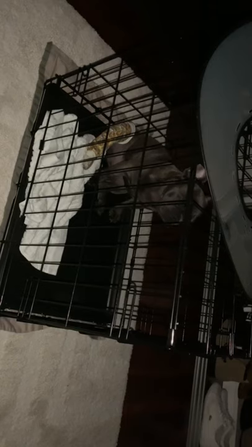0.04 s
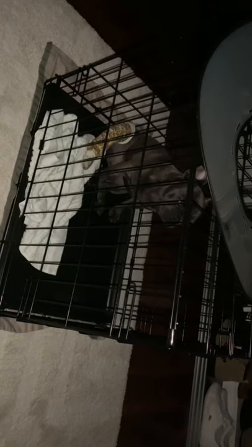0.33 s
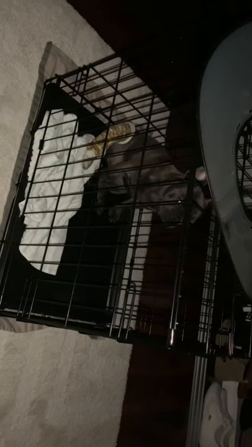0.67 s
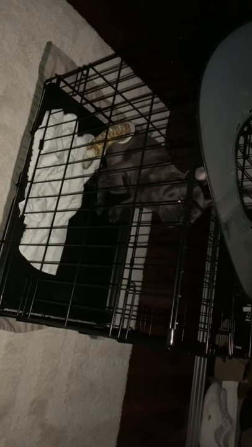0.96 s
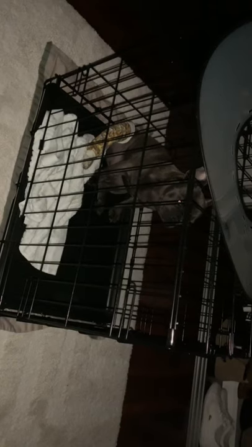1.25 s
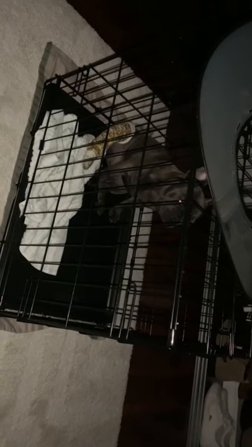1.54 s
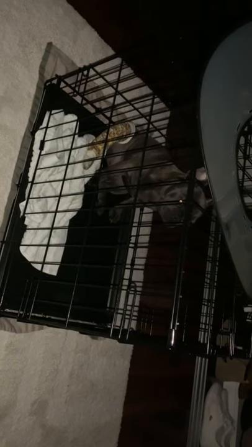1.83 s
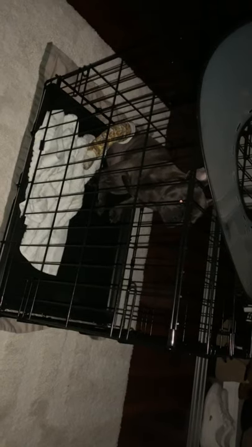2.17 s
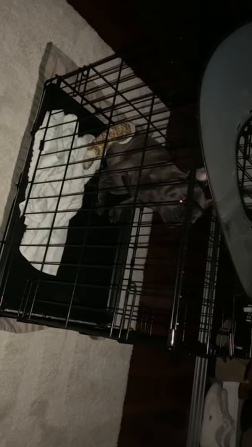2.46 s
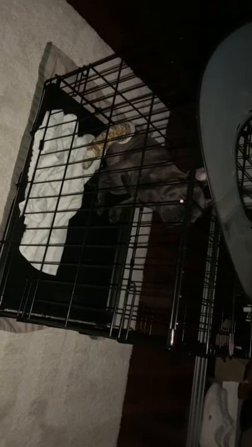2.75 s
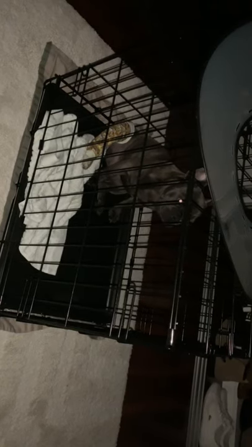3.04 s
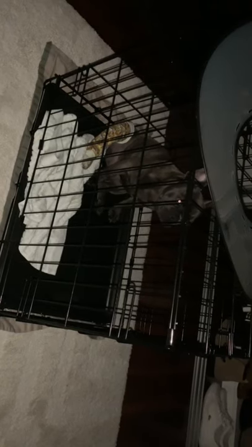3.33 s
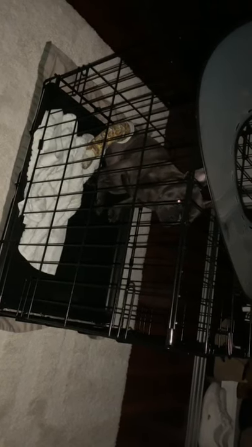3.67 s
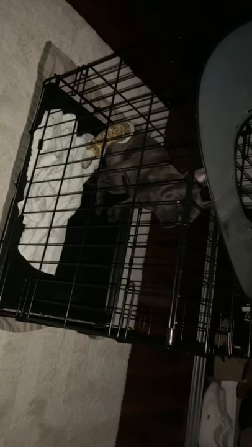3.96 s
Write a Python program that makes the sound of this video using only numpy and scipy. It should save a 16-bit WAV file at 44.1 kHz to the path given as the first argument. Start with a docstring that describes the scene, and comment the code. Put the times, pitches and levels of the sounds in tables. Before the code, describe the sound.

A dog gives a rough, pulsing snore that ends in a small grunt and a breath out. Faint wire ticks, bedding rustles and a lip smack follow, then a loud nose squeak, in a small room with humming ventilation.

```python
"""A dog snoring in its crate

A dog sleeps in a wire crate, in a small room filled with the low rumble and hum of ventilation.
Its soft palate flaps unevenly in a snore that brightens as the airway narrows, then ends in a low
grunt and a hiss. It breathes out through its nose, makes the wire tick, stirs on its bedding and
smacks its lips. Its nose whistles two short squeaks, the last one loud."""
import sys
import numpy as np
from scipy import signal
from scipy.fft import rfft, irfft, next_fast_len
from scipy.io import wavfile
from scipy.ndimage import map_coordinates

SR = 44100
rng = np.random.default_rng(int(sys.argv[2]) if len(sys.argv) > 2 else 0)


def file_out(sig):
    """Save sig as 16-bit WAV at sys.argv[1]."""
    # one column per channel
    cols = np.atleast_2d(sig).T
    # limit, then scale
    lim = np.clip(cols, -1, 1)
    pcm = np.round(lim * 32767).astype(np.int16)
    wavfile.write(sys.argv[1], SR, pcm)


N = 176400  # 4 seconds


def amp(db):
    """Turn decibels into a number to multiply by."""
    return 10 ** (np.asarray(db) / 20)


def unit(x):
    """Scale a sound to an average (rms) level of 1."""
    return x / np.sqrt(np.mean(x ** 2) + 1e-20)


def clock():
    """The time of each sample, in seconds."""
    return np.arange(N) / SR


def along(points, hz):
    """Read between rows of (frequency, value), spaced like musical pitch."""
    freqs, values = np.transpose(points)
    return np.interp(np.log(hz + 1), np.log(freqs + 1), values)


def wobble(rate):
    """A smooth curve through `rate` random values a second."""
    t = clock()
    curve = map_coordinates(rng.standard_normal(4000), [t[::16] * rate], mode="wrap")
    return np.interp(t, t[::16], curve)


def filtered(x, response):
    """Scale or delay each frequency as response(hz) says."""
    size = next_fast_len(N + SR // 2)
    return irfft(rfft(x, size) * response(np.fft.rfftfreq(size, 1 / SR)), size)[..., :N]


def coloured(x, points, tilt_db=0):
    """Give a sound the tone colour in a table, at an average level of 1."""
    hz = np.fft.rfftfreq(8192, 1 / SR)
    octave = np.log2((hz + 1) / points[0][0])
    octaves_outside = np.maximum(-octave, 0) + np.maximum(np.log2((hz + 1) / points[-1][0]), 0)
    gain = amp(along(points, hz) + tilt_db * octave - 30 * octaves_outside)
    # Make the filter ring after each sound, never before it.
    cepstrum = irfft(np.log(gain + 1e-6))
    half = len(cepstrum) // 2
    cepstrum[1:half] *= 2
    cepstrum[half + 1:] = 0
    ring = irfft(np.exp(rfft(cepstrum)))
    return unit(signal.oaconvolve(x.astype("f4"), ring.astype("f4"))[:N])


def noise():
    """White noise: an even hiss."""
    return rng.standard_normal(N)


def envelope(start, attack, hold, db, fall):
    """Rise to `db`, hold, then fade by `fall` dB a second. Times are in seconds."""
    t = np.arange(SR) / SR
    shape = np.clip(t / attack, 0, 1) * amp(db - fall * np.maximum(t - attack - hold, 0))
    return np.pad(shape, (round(start * SR), N))[:N]


# The tone of the rumble, and of a faint background hiss that is hollow near 5 and 9 kHz.
# Each row: frequency in Hz, relative level in dB.
RUMBLE_COLOUR = [(18, -8.5), (34, 2), (44, 0.5), (62, -2.5), (85, -3), (145, -2), (205, -5), (265, -15),
                 (330, -13), (450, -18), (620, -19)]
BACKGROUND_COLOUR = [(700, -1), (1100, -3), (1600, -7), (2400, -16.5), (3500, -23), (5000, -32.5),
                     (6800, -23), (9000, -36), (11000, -26), (15500, -37)]
# How alike left and right are. Each row: frequency in Hz, likeness (1 means the same).
STEREO_LIKENESS = [(30, 0.97), (170, 0.98), (350, 0.51), (700, 0), (4000, 0.03)]
# The humming tones. Each row: pitch in Hz, level in dB, width of the pitch's wander in Hz.
HUM_TONES = [(54.559, -60, 7), (117.78, -53.5, 5.9), (364.3, -73.5, 7), (943, -76.5, 7.95)]

def ventilation(rumble_db=-49.5, hiss_db=-70):
    """Ventilation rumbles and hums unsteadily; its bass is nearly the same in both ears."""
    def spread(hz):
        angle = np.arccos(np.clip(along(STEREO_LIKENESS, hz), -1, 1)) / 2
        return np.array([np.cos(angle), np.sin(angle)])

    pair = np.array([amp(rumble_db) * coloured(noise(), RUMBLE_COLOUR)
                     + amp(hiss_db) * coloured(noise(), BACKGROUND_COLOUR) for _ in range(2)])
    mid, side = filtered(pair, spread)  # what the ears share, and what sets them apart
    for hz, db, width in HUM_TONES:
        swell = amp(3.25 * wobble(9.7))
        pitch = hz + width / 2 * wobble(20)
        mid = mid + amp(db) * unit(swell * np.sin(2 * np.pi * np.cumsum(pitch) / SR))
    return np.array([mid + side, mid - side])


def palate_flaps(rate_hz=140.3, jitter=0.2, scatter_db=1, puff_s=0.0043, air_db=0.6):
    """The soft palate slaps shut at uneven intervals; each flap lets a puff of air through."""
    gap, strength = rng.standard_normal((1500, 2)).T
    at = (np.cumsum(np.exp(jitter * gap)) / rate_hz * SR).astype(int)
    slaps = np.bincount(at[at < N], amp(scatter_db * strength[at < N]), N)
    puffs = signal.lfilter([1], [1, -np.exp(-1 / (puff_s * SR))], slaps)
    return unit(slaps) + amp(air_db) * unit(puffs * noise())


# The snore's surges. Each row: time of the peak in seconds, throat and nose levels in relative dB.
SNORE_SURGES = [(0, -47.5, -51.5), (0.056, -45, -60), (0.149, -45.5, -55), (0.242, -43, -53.5),
                (.317, -45.5, -52.5), (0.399, -43, -51), (0.488, -43.5, -51), (0.573, -45.5, -53.5),
                (.625, -46, -57.5), (0.679, -47.5, -54.5), (0.754, -44, -49.5), (0.794, -44.5, -53.5),
                (0.839, -48.5, -50.5), (.88, -42, -52), (0.917, -45.5, -44.5)]
# How the throat rings, and the nose before and after the airway narrows.
# Each row: frequency in Hz, relative level in dB.
THROAT_COLOUR = [(440, -20), (585, -15), (700, -5.5), (770, -10.5), (810, -2.5), (850, -8), (910, 0.5),
                 (975, -7), (1040, -8), (1190, -16.5), (1280, -27.5)]
NOSE_COLOUR = [(1260, -20), (1380, 4.5), (1440, -8), (1525, -1), (1590, -19), (1680, -7), (1950, -14),
               (2250, -31.5), (2600, -17.5), (2850, -24), (3250, -31.5), (4000, -32.5)]
NARROWED_COLOUR = [(600, -16), (1280, -8.5), (1520, 5.5), (1620, 2), (1900, -0.5), (2250, -16),
                   (2800, -14.5), (4000, -31)]

def snore(surge_s=0.028, narrow_at_s=0.72, narrowing_s=0.018, release_at_s=0.925):
    """The flaps ring throat and nose in surges, turn brighter, and stop as the airway opens."""
    t, flaps = clock(), palate_flaps()
    peak_s, throat_db, nose_db = np.transpose(SNORE_SURGES)
    swells = np.exp(-np.minimum(np.abs(t - peak_s[:, None]) / surge_s, 10) ** 2)
    throat_level = np.sqrt(amp(throat_db + 0.14) ** 2 @ swells)
    nose_level = np.sqrt(amp(nose_db + 0.35) ** 2 @ swells)
    narrow = np.clip((t - narrow_at_s) / narrowing_s, 0, 1)
    throat = coloured(flaps, THROAT_COLOUR)
    nose = (1 - narrow) * coloured(flaps, NOSE_COLOUR) + narrow * coloured(flaps, NARROWED_COLOUR)
    release = amp(-484 * np.maximum(t - release_at_s, 0))  # fades 484 dB a second
    return (throat_level * throat + nose_level * nose) * release


# A low grunt, then two squeaks. Each row: start, rise and hold in seconds, fade in dB a second,
# level in dB, first pitch and resting pitch in Hz, sag time in seconds.
WHISTLES = [(0.888, 0.011, .012, 1005, -51.5, 620, 566, .01),
            (2.18, 0.0089, 0.018, 600, -62, 1816, 1753, 0.022),
            (3.906, 0.016, 0.0074, 802.5, -39, 1148, 798, 0.011)]
# The relative level in dB of each harmonic (1, 2, 3 and 4 times the pitch).
HARMONICS_DB = [2.5, -7, -23, -24.5]
# The breath in each whistle. Each row: frequency in Hz, relative level in dB.
WHISTLE_AIR_COLOUR = [(700, -9.5), (1000, 4), (1750, -4), (2150, -21), (6000, -21.5), (9000, -49)]

def nose_whistles(waver=0.03, rough_db=3, air_db=-9):
    """The narrowed nose whistles: a rough, airy tone that sags to its resting pitch."""
    out = np.zeros(N)
    air = amp(air_db) * coloured(noise(), WHISTLE_AIR_COLOUR)
    drift = 1 + waver * wobble(300)
    flutter = amp(rough_db * wobble(200))
    for start, attack, hold, fall, db, first_hz, rest_hz, sag_s in WHISTLES:
        hz = rest_hz + (first_hz - rest_hz) * np.exp(-np.clip(clock() - start, 0, 1) / sag_s)
        phase = 2 * np.pi * np.cumsum(hz * drift) / SR
        tone = unit(sum(amp(level) * np.sin(k * phase) for k, level in enumerate(HARMONICS_DB, 1)))
        out += envelope(start, attack, hold, db, fall) * (tone + air)
    return out * flutter


# A bright hiss, hollow near 5 and 9 kHz, and the tone of the breath out.
# Each row: frequency in Hz, relative level in dB.
HISS_COLOUR = [(1500, -1.5), (3800, 1.5), (4900, -5), (6200, 5.5), (7600, -4.5), (9000, -22.5),
               (11000, -10), (15000, -17.5)]
BREATH_COLOUR = [(700, -8), (950, 2.5), (1750, -0.5), (2170, 6), (2700, -10.5), (4000, -9.5), (7000, -34)]

def dog_breath(spit_db=3):
    """Air rushes through the open airway: a spitting hiss, then a soft breath out."""
    hiss = coloured(noise() * amp(spit_db * wobble(400)), HISS_COLOUR)
    breath = coloured(noise(), BREATH_COLOUR)
    return (hiss * envelope(start=0.94, attack=0.003, hold=0.075, db=-60.5, fall=225)
            + breath * envelope(start=1.04, attack=0.14, hold=0.17, db=-64.5, fall=95))


# Light touches on the crate. Each row: start in seconds, level of the scrape in dB.
WIRE_TOUCHES = [(1.311, -70), (1.625, -67), (1.642, -68.5), (1.679, -78), (2.336, -70), (3.062, -71.5),
                (3.092, -76)]
# A bar's ringing tones, and the tone of its scrape. Each row: frequency in Hz, relative level in dB.
BAR_TONES = [(4021, 3), (4705, -4), (5750, -7), (7058, 0), (11224, -8), (14220, -9)]
SCRAPE_COLOUR = [(3500, 4.5), (7000, 0.5), (9000, -16.5), (11500, -11.5), (15000, -2.5)]

def wire_ticks(attack_s=0.0046, ring_s=0.13, ring_db=-6, detune=0.018):
    """Each light touch scrapes a slightly different bar and makes it ring briefly."""
    out, t = np.zeros(N + SR), np.arange(SR // 4) / SR
    scrape = coloured(noise(), SCRAPE_COLOUR)
    ring_shape = (1 - np.exp(-t / attack_s)) * amp(-60 * t / ring_s)
    for start, db in WIRE_TOUCHES:
        tuning = 1 + detune * rng.normal()
        ring = sum(amp(level + rng.normal(0, 2.6)) * np.sin(2 * np.pi * tuning * hz * t)
                   for hz, level in BAR_TONES)
        out[round(start * SR):][:len(t)] += amp(db + ring_db) * ring * ring_shape
        out[:N] += scrape * envelope(start, attack_s, hold=0, db=db, fall=280)
    return out[:N]


# The dog stirs. Each row: start, rise and hold in seconds, level in dB, brightening in dB an octave.
CLOTH_RUBS = [(1.61, 0.045, 0.029, -67, -9), (2.166, 0.018, 0.059, -72.5, 7),
              (3.017, 0.028, 0.023, -80, 4.5), (3.107, 0.0076, 0.013, -62.5, -9)]
# The tone of the cloth. Each row: frequency in Hz, relative level in dB.
CLOTH_COLOUR = [(700, -18.5), (1200, -1.5), (2400, 5), (3700, 5.5), (5500, -15.5), (8000, -25),
                (15000, -36)]

def bedding(grain_db=3.5):
    """Cloth rubs in short, grainy rustles."""
    grains = noise() * amp(grain_db * wobble(500))
    return sum(envelope(start, attack, hold, db, fall=262) * coloured(grains, CLOTH_COLOUR, tilt)
               for start, attack, hold, db, tilt in CLOTH_RUBS)


# The clicks of one wet smack. Each row: start in seconds, level in dB, fade in dB a second.
LIP_CLICKS = [(1.881, -64.5, 206), (1.9028, -49, 2800), (1.9097, -56.5, 554), (1.924, -64.5, 263),
              (1.938, -76.5, 402)]
# The tone of the mouth. Each row: frequency in Hz, relative level in dB.
MOUTH_COLOUR = [(800, -7.5), (1400, 0.5), (2400, -0.5), (3600, 0), (5500, -5.5), (8000, -20), (15000, -32)]

def lip_smack(attack_s=0.00045, grain_db=3):
    """Saliva snaps between the lips: a few sharp clicks that trail off in crackle."""
    snaps = sum(envelope(start, attack_s, 0, db, fall) for start, db, fall in LIP_CLICKS)
    crackle = noise() * amp(grain_db * wobble(700))
    return snaps * coloured(crackle, MOUTH_COLOUR)


# How long the room echoes. Each row: frequency in Hz, seconds to fade by 60 dB.
ECHO_TIMES = [(1000, 0.37), (4000, 0.11)]

def room(x, echo_db, side_db, delay_s=0):
    """The walls add a short echo that widens the sound, at about the same overall level."""
    hz, t, spectrum = signal.stft(rng.standard_normal((2, SR // 2)), SR, nperseg=256)
    fade = amp(-60 * t / along(ECHO_TIMES, hz)[:, None]) * (t >= delay_s)
    tail = signal.istft(spectrum * fade, SR, nperseg=256)[1]
    echo, side = signal.fftconvolve(x[None], tail / np.linalg.norm(tail[0]), axes=1)[:, :N]
    mid = (x + amp(echo_db) * echo) / np.hypot(1, amp(echo_db))
    return np.array([mid + amp(side_db) * side, mid - amp(side_db) * side])


def from_left(pair, lead_s):
    """The crate lies to the left, so its sound reaches that side first."""
    return filtered(pair, lambda hz: np.exp(1j * np.pi * hz * lead_s * np.array([[1], [-1]])))


def scene():
    """The dog and its crate in the humming room."""
    snoring = room(snore(), echo_db=-6, side_db=-12.5)
    whistles = room(nose_whistles(), echo_db=-9, side_db=-14, delay_s=0.012)
    stirring = room(dog_breath() + bedding() + lip_smack() + wire_ticks(), echo_db=-5, side_db=-5.5)
    dog = from_left(snoring + whistles + stirring, lead_s=0.000096)
    return (dog + ventilation()) * amp([[0.2], [-0.2]])  # a touch louder on the left


def record(dry, top_hz=15700):
    """Cut away the very highest treble."""
    return filtered(dry, lambda hz: hz < top_hz)


dry = scene()
out = record(dry)
file_out(out)
```